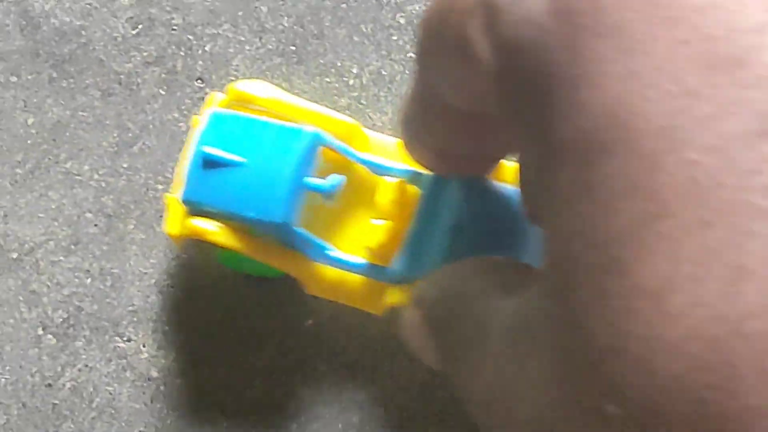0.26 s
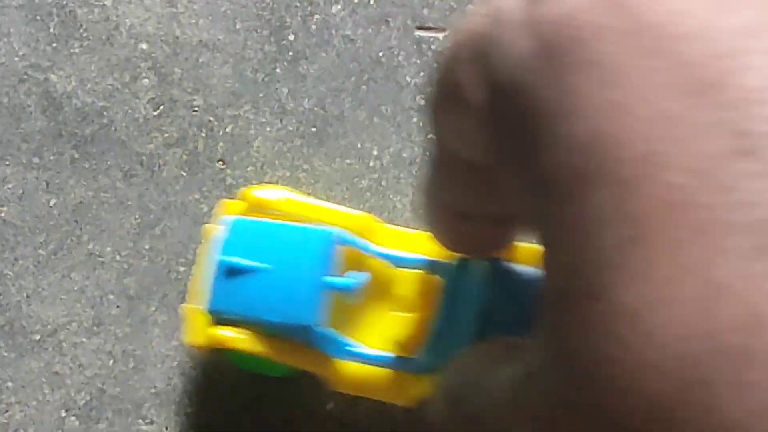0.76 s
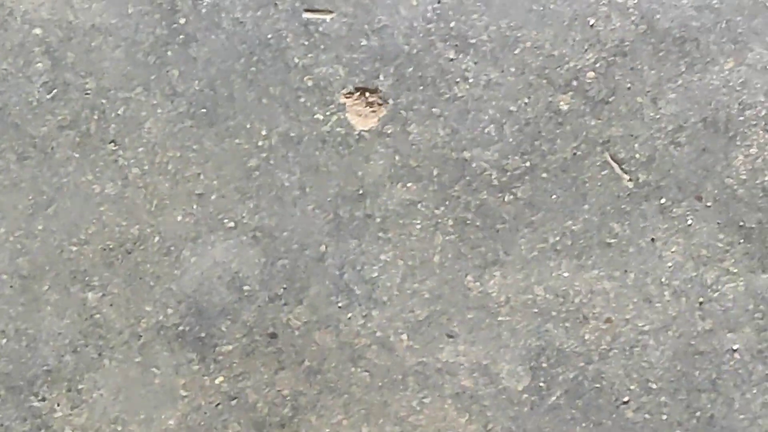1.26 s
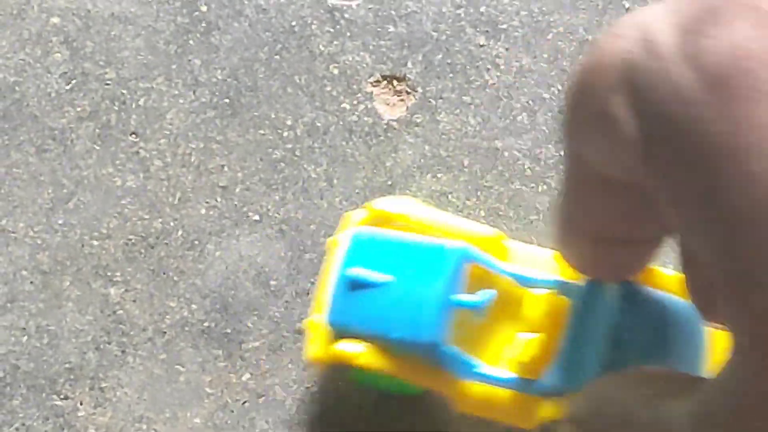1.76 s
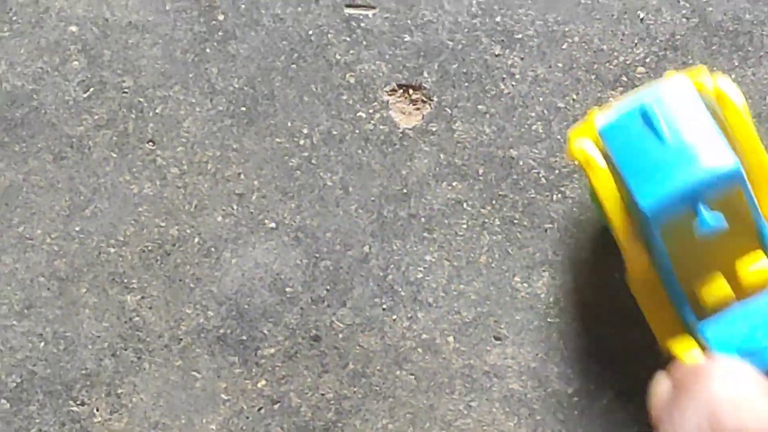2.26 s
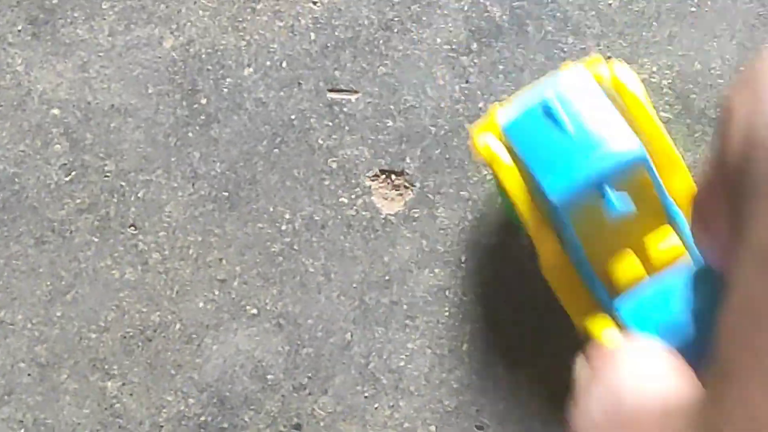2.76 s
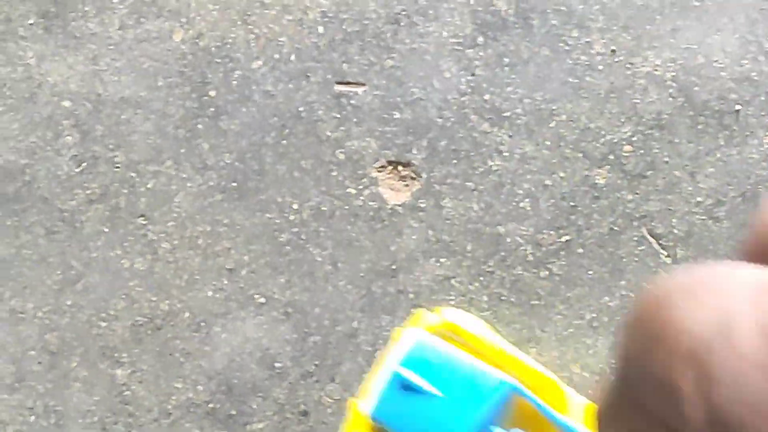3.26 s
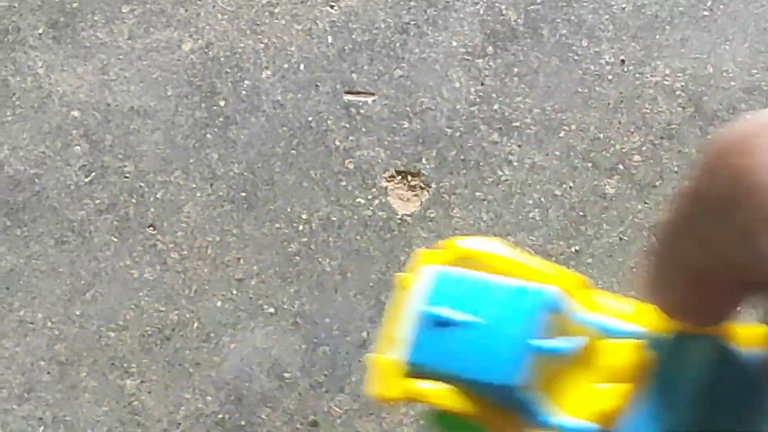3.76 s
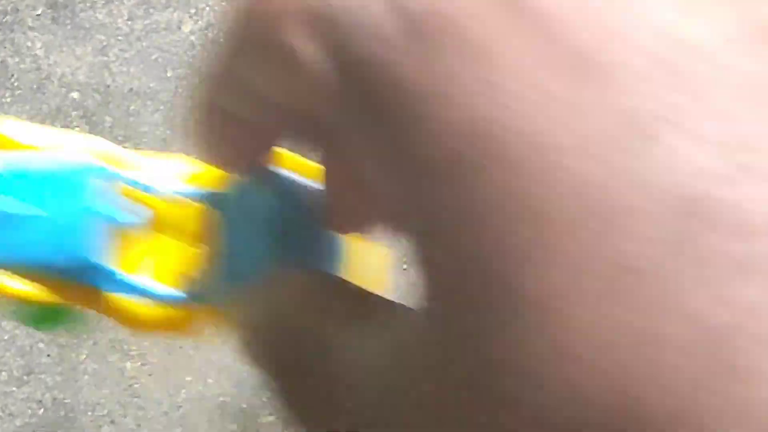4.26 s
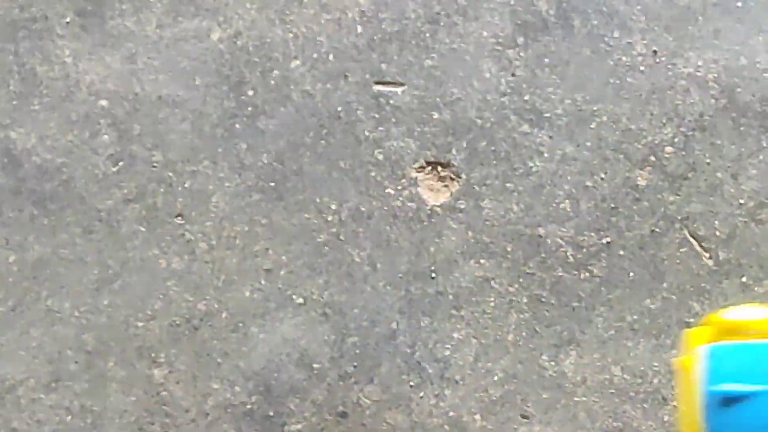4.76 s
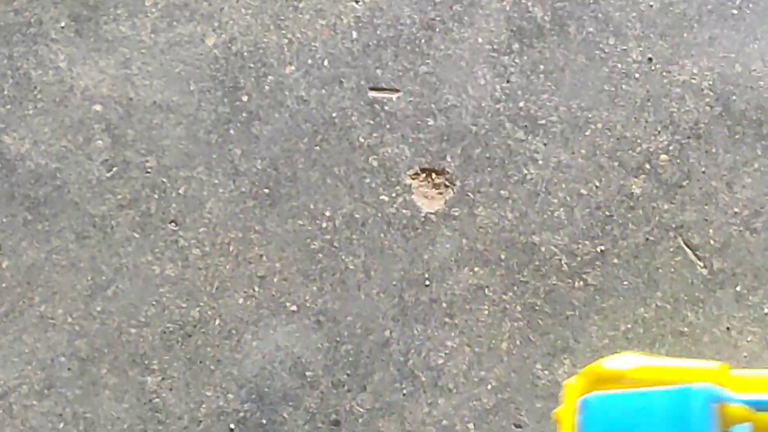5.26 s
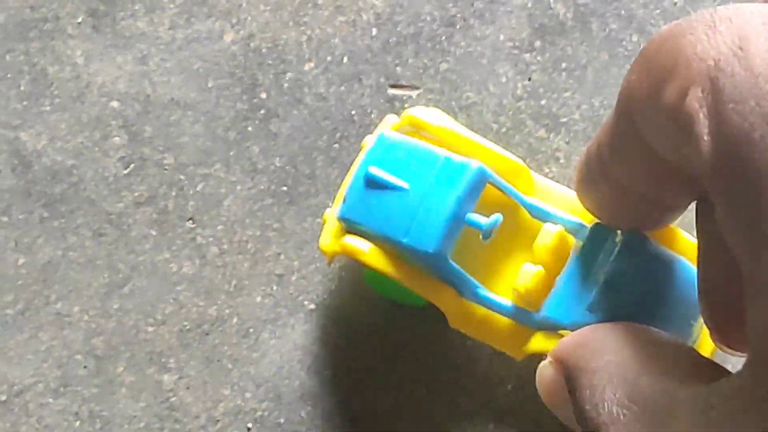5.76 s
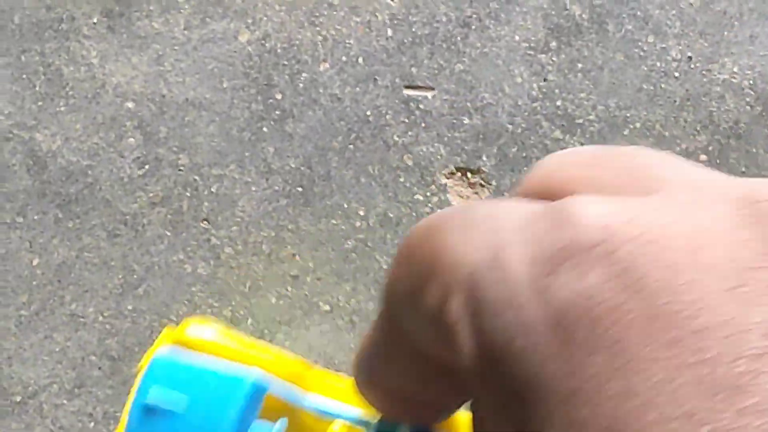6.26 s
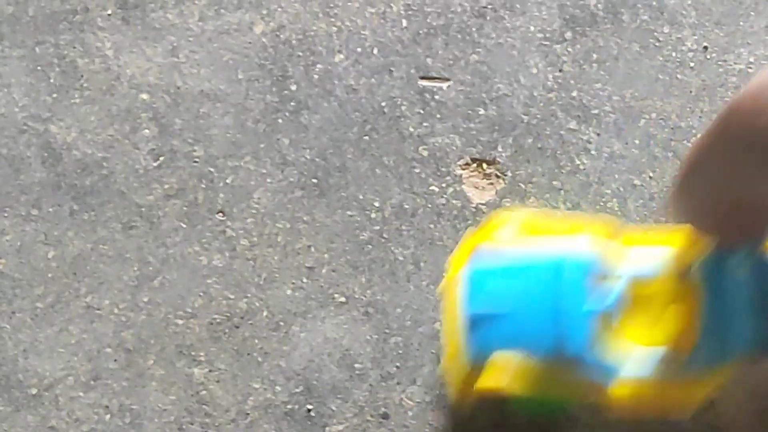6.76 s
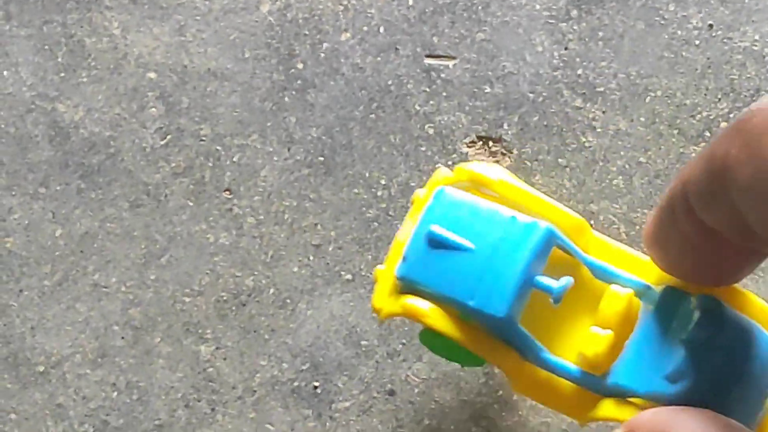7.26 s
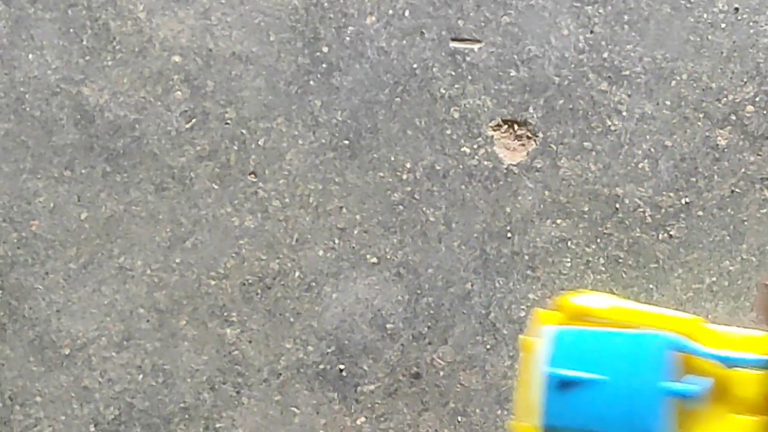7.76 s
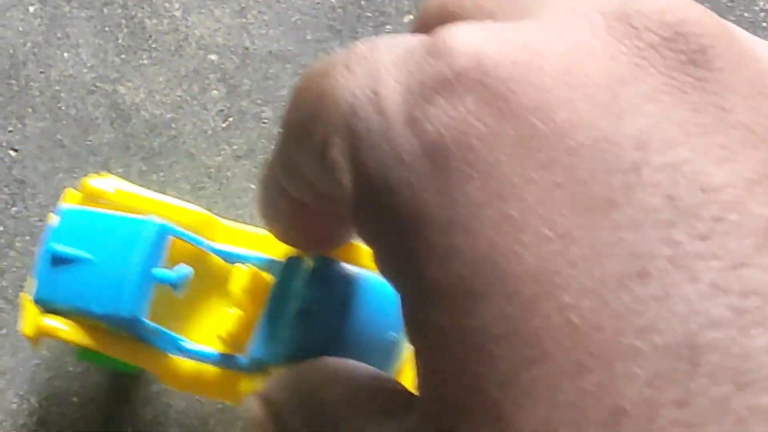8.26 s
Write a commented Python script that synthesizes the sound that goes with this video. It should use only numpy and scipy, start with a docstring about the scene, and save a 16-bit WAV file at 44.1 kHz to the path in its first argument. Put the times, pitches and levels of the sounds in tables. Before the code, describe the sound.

A hand pushes a small plastic toy car back and forth on rough concrete. Bright, brittle wheel rattle comes in uneven surges with brief lifts between. Soft dull hand bumps and a rumbling gust come midway; sharp plastic knocks then grow to a dense clatter before easing to sparse scrapes. Quiet open air, distant traffic, faint bird; close microphone, toy to the right, little echo.

```python
"""From the start a small hollow plastic toy car, pushed by hand over rough concrete, rattles in surges, louder right.
Grit taps, thousands a second, ring damped shell, wheel and edge modes; knocks ring the same modes harder.
Far traffic and wind, filtered noise, run throughout; a gust near 3.4 s lifts the lows and a narrow-noise hum.
From 3.7 s a far bird chirps faintly in gliding sines; dull noise-burst bumps come between 2.3 and 5.3 s.
From 4 s knocks and bright noise snaps grow harder, densest near 6.5 s; the rolling then thins out."""
import sys
import numpy as np
from scipy import signal
from scipy.fft import rfft, irfft, next_fast_len
from scipy.io import wavfile
from scipy.ndimage import map_coordinates

SR = 44100
rng = np.random.default_rng(int(sys.argv[2]) if len(sys.argv) > 2 else 0)


def file_out(sig):
    """Save sig as 16-bit WAV at sys.argv[1]."""
    # one column per channel
    cols = np.atleast_2d(sig).T
    # limit, then scale
    lim = np.clip(cols, -1, 1)
    pcm = np.round(lim * 32767).astype(np.int16)
    wavfile.write(sys.argv[1], SR, pcm)


def magnitude_from_level(level_db):
    """Linear magnitude for a level in decibels (20 dB per decade)."""
    exponent = np.asarray(level_db, float) / 20
    return 10 ** exponent


N = 375820

# wind buffeting spectrum: hz, relative_db_per_hz
BUFFET_SPECTRUM = [(7.1, -33), (12, 9), (29, -3.5), (41, -3.5), (52, -21), (70, -12.5), (91, -41),
                   (150, -120)]
# far traffic spectrum: hz, relative_db_per_hz
TRAFFIC_SPECTRUM = [(29, -38.5), (50, -1), (96, 3), (167, -7.5), (280, -18), (360, -44), (620, -120)]
# low-mid wash spectrum, also that of the rolling grumble: hz, relative_db_per_hz
WASH_SPECTRUM = [(130, -19), (220, -4), (414, -2), (480, -4.5), (1200, -19), (1560, -41), (2640, -120)]
# open-air hiss spectrum: hz, relative_db_per_hz
AIR_SPECTRUM = [(470, -18), (800, -1.5), (893, -3), (2570, -7.5), (2900, -6.5), (3240, -8.5), (3710, -7.5),
                (9300, -17), (13800, -17), (15000, -57)]
# left-right likeness of noise: hz, likeness_0_to_1
LIKENESS = [(30, 0.6), (125, 0.66), (250, 0.52), (500, 0.23), (1500, 0.018)]
# wind with one strong gust: time_s, over_calm_db
GUST = [(0.0, 0), (1.5, 0.5), (2.3, 2.5), (3.2, -1.5), (3.38, 15), (3.5, 15), (3.61, 6), (3.82, 9),
        (4.1, 4.5), (4.5, 1.5), (5.0, 3), (6.2, 1), (6.7, 2), (8.5, 0)]
# wash of far traffic and wind: time_s, level_db
WASH_LEVEL = [(0.0, -72), (1.1, -69.5), (1.6, -75.5), (2.4, -71.5), (3.25, -72), (3.45, -59), (3.62, -67),
              (4.0, -73.5), (5.1, -70.5), (6.0, -74.5), (7.3, -73.5), (8.5, -74)]
# bird notes before flutter and echo: start_s, length_s, start_hz, end_hz, level_db
BIRD_NOTES = [(3.706, 0.096, 3840, 3750, -85), (4.44, 0.09, 4480, 4530, -84), (4.48, 0.11, 3870, 3740, -82),
              (5.11, 0.078, 2860, 2800, -78), (7.399, 0.081, 3620, 3780, -83),
              (8.165, 0.075, 3420, 3670, -78), (8.202, 0.076, 3700, 3570, -80),
              (8.247, 0.092, 3400, 3120, -81), (8.28, .05, 3550, 3680, -87), (8.294, .1, 2980, 2750, -84)]
# echo decay: hz, t60_s
YARD_DECAY = [(800, 0.15), (5000, 0.27), (14000, 0.038)]
# soft contacts of the hand: start_s, centre_hz, width_hz, level_db, rise_s, t60_s
BUMPS = [(2.332, 334, 280, -51, 0.0044, 0.059), (3.385, 129, 110, -51, 0.0067, 0.18),
         (4.13, 298, 130, -52, 0.058, 0.47), (5.261, 430, 60, -61, 0.027, 0.32)]
# grit crushed under a blow, before the high-pass: start_s, level_db
SNAPS = [(3.1712, -44), (3.9924, -61), (4.0055, -57), (4.116, -56), (4.2103, -24), (4.756, -24.5),
         (4.761, -28), (5.325, -49), (6.002, -39), (6.4552, -42), (6.5146, -39), (6.5304, -29),
         (6.625, -28), (6.8107, -17), (7.7014, -59), (7.705, -35)]
# toy position: time_s, left_over_right_db
PAN = [(0.0, -10), (.6, -11), (3.6, -10), (3.9, -11.5), (4.5, -10.5), (4.75, -13), (5.58, -11),
       (6.38, -13.5), (7.3, -8), (8.2, -14)]
# share of the left-right step that a mode feels: hz, share
SHADOW = [(900, 0.022), (1500, 0.045), (2500, 0.66), (5500, 0.69), (9000, 0.55), (13000, 1)]
# hollow shell modes, width before damping: hz, base_width_hz, relative_db
SHELL_MODES = [(766, 780, -15), (1110, 980, -8), (1540, 630, -4), (2000, 1020, -0.5), (2500, 860, 1)]
# wheel modes, width before damping: hz, base_width_hz, relative_db
WHEEL_MODES = [(3400, 1100, -3.5), (4390, 1460, -2), (4915, 600, -4), (5410, 480, -4), (5930, 670, -4.5),
               (6500, 520, -5), (7020, 460, -6.5), (7580, 780, -6.5)]
# thin edge modes, width before damping: hz, base_width_hz, relative_db
EDGE_MODES = [(8400, 2800, 4), (9110, 2500, 1.5), (10320, 1500, -3.5), (11540, 1000, -6.5),
              (12620, 1500, -5.5), (13800, 1600, -6.5)]
# shoves and skids; rise and fall span 20 dB: peak_s, wheel_level_db, rise_s, fall_s, shell_over_wheels_db
SURGES = [(.15, -68, 0.26, 0.065, -2), (0.179, -55.5, 0.011, 0.095, -7), (.358, -60, 0.11, 0.12, -6.5),
          (.455, -57, 0.074, 0.13, -11), (.515, -53.5, 0.1, 0.025, -10.5), (.675, -63.5, 0.013, 0.24, -5),
          (.81, -52.5, 0.14, 0.17, -6.5), (.988, -49, 0.076, 0.057, -7.5), (1.125, -54.5, 0.16, 0.09, -6),
          (1.21, -57.5, 0.13, 0.085, -6.5), (1.34, -61.5, .015, 0.034, -16),
          (1.368, -58.5, 0.026, 0.28, -14), (1.439, -45.5, 0.02, 0.15, -16), (1.515, -55, 0.1, 0.17, -5.5),
          (1.605, -55.5, 0.036, 0.039, -7.5), (1.781, -69.5, 0.038, 0.06, -5),
          (1.817, -52.5, 0.0064, 0.14, -12.5), (1.901, -49, 0.078, 0.28, -9),
          (2.145, -59.5, 0.044, 0.032, -7), (2.19, -53.5, 0.011, 0.073, -11),
          (2.258, -55, 0.052, 0.12, -10), (2.478, -55.5, 0.13, 0.21, -7), (2.75, -64, 0.019, 0.18, -18),
          (2.834, -50.5, 0.14, 0.05, -7.5), (2.9, -51.5, 0.037, 0.1, -9.5),
          (2.97, -50.5, 0.02, 0.22, -10.5), (3.18, -65, .015, 0.13, -16), (3.22, -54, 0.046, 0.29, -13),
          (3.3, -49.5, 0.2, 0.17, -6), (3.39, -55.5, 0.2, 0.061, -8), (3.526, -61.5, 0.18, 0.068, -7),
          (3.64, -64, 0.05, 0.12, -8.5), (4.011, -49, 0.016, 0.094, -10), (4.12, -53.5, 0.0092, 0.16, -6.5),
          (4.17, -50.5, 0.086, 0.13, -9.5), (4.219, -40.5, 0.027, 0.081, -8.5),
          (4.258, -45, 0.099, 0.089, -12.5), (4.765, -48, 0.025, 0.12, -16),
          (4.855, -46, 0.049, 0.18, -10.5), (4.94, -52.5, 0.13, 0.08, -5.5), (5.333, -63, 0.017, 0.18, -6),
          (5.41, -54.5, 0.029, 0.11, -0.5), (5.471, -44.5, 0.11, 0.07, -16),
          (5.668, -41.5, 0.088, 0.083, -9.5), (5.875, -59, 0.074, 0.15, -4.5), (5.98, -66, 0.31, .03, -12),
          (6.023, -48.5, 0.013, 0.39, -9.5), (6.12, -49.5, 0.14, 0.37, -3.5), (6.35, -53, 0.58, 0.17, -14),
          (6.451, -44.5, 0.013, 0.16, -2), (6.535, -35.5, 0.12, 0.045, -11.5),
          (6.62, -42.5, 0.072, 0.081, -9.5), (6.733, -39.5, 0.04, 0.14, -13.5),
          (6.77, -43, 0.07, 0.038, -8.5), (6.821, -35, 0.035, 0.074, -12), (6.914, -41.5, 0.061, 0.06, -14),
          (6.97, -45.5, 0.011, 0.091, -8), (6.998, -48.5, 0.074, 0.086, -26),
          (7.124, -47, 0.068, 0.037, -15), (7.145, -62, .02, 0.13, -13), (7.71, -50.5, .011, 0.036, -26),
          (7.796, -57.5, 0.091, 0.021, -9), (7.96, -54, 0.27, 0.095, -9), (8.29, -76.5, 0.049, 0.16, -5),
          (8.433, -66, 0.073, 0.11, 0)]
# wheels touch down; a surge is silent before the last touch ahead of its peak: time_s
SET_DOWN_S = [0.0, .66, 1.335, 1.81, 2.736, 3.165, 3.993, 4.748, 5.315, 6.447, 7.098, 7.7, 8.4]
# edges against wheels in rolling, before lag and trim: time_s, relative_db
EDGE_LEVEL = [(0.0, -4.5), (.6, -3.5), (1.7, -6), (2.2, -4), (3.3, -5.5), (4.1, -5), (4.8, -7), (5.3, -7),
              (5.8, -5.5), (6.2, -4.5), (6.7, -5), (7.2, -8.5), (8.0, -6)]
# modes that face the microphones as the toy tilts: time_s, favoured_wheel_hz, favoured_shell_hz
TILT = [(.2, 5500, 1770), (.45, 5100, 2180), (.8, 5100, 1602), (.98, 5900, 1840), (1.13, 5260, 1670),
        (1.5, 5430, 1800), (1.9, 5330, 2020), (2.2, 5430, 2200), (2.5, 5950, 1770), (2.9, 6200, 1850),
        (3.3, 5290, 1790), (4.03, 5490, 2200), (4.25, 6050, 1900), (4.86, 5500, 1670), (5.45, 5600, 1840),
        (5.67, 6100, 1860), (5.9, 5900, 1920), (6.12, 5900, 2540), (6.3, 6030, 1800), (6.47, 5560, 2240),
        (6.53, 6060, 2170), (6.62, 6000, 1965), (6.73, 5750, 2280), (6.76, 7100, 2160), (6.83, 6220, 2340),
        (6.92, 7200, 2305), (6.99, 5930, 2000), (7.12, 6900, 2200), (7.85, 5380, 1840)]
# knocks, before trim and per-part offsets: start_s, level_db, pitch_hz
KNOCKS = [(.1785, -43.5, 5740), (.2135, -44.5, 5500), (.3477, -46, 5500), (.396, -43, 4480),
          (.446, -50, 5500), (.5153, -39, 5940), (.738, -49, 5000), (.7578, -51, 5000), (.807, -45, 6000),
          (.821, -39, 6900), (.9028, -40, 6120), (.9642, -36, 6600), (.978, -42, 6300), (.986, -45, 6000),
          (.992, -41, 6500), (1.108, -45, 5400), (1.118, -43, 5400), (1.141, -39, 5300),
          (1.1772, -38, 5700), (1.309, -50, 4880), (1.3398, -49, 6350), (1.3665, -42, 5400),
          (1.4302, -39, 5250), (1.816, -50, 6000), (1.8285, -45, 6760), (1.864, -35, 6790),
          (1.8893, -31, 4650), (2.0862, -38.5, 5260), (2.1356, -42, 5300), (2.1897, -40.5, 5160),
          (2.245, -43, 6500), (2.253, -51, 5630), (2.4734, -41, 7000), (2.5062, -34.5, 7100),
          (2.7417, -46, 6530), (2.817, -35, 4710), (2.8938, -35.5, 7140), (2.9682, -47, 6420),
          (3.0898, -37.5, 5800), (3.172, -43.5, 5300), (3.1977, -44, 5300), (3.2181, -43, 5000),
          (3.392, -48, 5000), (3.523, -53, 5500), (3.9868, -54, 6170), (3.9935, -38, 6160),
          (4.0052, -25, 5830), (4.0097, -45, 7000), (4.0145, -38, 4800), (4.0178, -32, 4800),
          (4.19, -31, 5720), (4.2103, -22.5, 5170), (4.7488, -40, 6630), (4.7549, -22, 5900),
          (4.7558, -17, 6800), (4.7606, -28, 5000), (5.3153, -34, 6900), (5.3265, -24.5, 6000),
          (5.3356, -41, 5600), (5.4035, -51, 5590), (5.648, -38, 6000), (5.668, -33, 6300),
          (5.839, -39, 5900), (5.8702, -41, 5350), (5.9161, -47.5, 5140), (5.96, -47, 5250),
          (6.0008, -40, 5770), (6.0135, -47, 5000), (6.0258, -49, 6200), (6.1238, -35, 7100),
          (6.2314, -44, 6180), (6.3775, -40, 5570), (6.4557, -23, 5370), (6.449, -35, 5460),
          (6.469, -27, 5600), (6.4965, -30, 6260), (6.5136, -18.5, 5530), (6.5165, -23, 6000),
          (6.521, -23, 6500), (6.5311, -15, 6300), (6.5394, -26.5, 6440), (6.5528, -28, 5530),
          (6.6242, -26, 5800), (6.7132, -40, 5450), (6.7277, -23, 5400), (6.7317, -21, 5440),
          (6.746, -22, 7000), (6.76, -27, 7000), (6.773, -25, 6700), (6.8105, -30, 7140),
          (6.8255, -34, 6000), (6.8958, -28, 6800), (6.922, -24, 7200), (6.9686, -37, 5460),
          (7.031, -50, 7400), (7.1014, -33, 7460), (7.6903, -42, 6900), (7.7043, -27, 5840),
          (7.7072, -37, 6500), (7.841, -48, 5500), (7.865, -45, 6500), (7.885, -34.5, 5800),
          (7.9348, -36, 4700), (7.9655, -33, 5260), (8.4048, -51.5, 5000), (8.4277, -44, 5260)]
# steep low-pass above 14 kHz: hz, gain_db
LOW_PASS = [(13900, -1), (14250, -9), (14400, -28), (16000, -38)]
# colour of the left port: hz, gain_db
LEFT_PORT = [(1600, 0.5), (2200, 1), (3000, 2), (4500, 1), (6500, -1), (7600, -0.5), (8700, 3.5),
             (9400, -0.5), (10400, -5), (11600, 0.5), (13500, 0.5)]
# colour of the right port: hz, gain_db
RIGHT_PORT = [(2600, 0), (3100, -3), (3500, 0), (7500, 2), (8300, -6.5), (9400, 0.5), (11000, 1.5),
              (13200, 0.5)]

BUFFET_DB, TRAFFIC_DB, AIR_DB = -59, -66.5, -71.5
HUM_PEAK_S, HUM_DB, HUM_RISE_S, HUM_FALL_S = 3.4, -57, 0.12, 1.31  # rise and fall span 20 dB
SWELL_POWER = 1.253  # 1 = pointed, 2 = rounded
SNAP_T60_S, SNAP_LOW_HZ = 0.0055, 7540
TICKS_PER_S, TICK_LEAST_DB, TICK_BASE_HZ = 70, -5, 5900  # level over the rattle
KNOCK_SHELL_DB, KNOCK_EDGE_DB = -12, -9  # against the wheels, before lag
SHELL_LAG, KNOCK_EDGE_LAG = 0.6, 0.09  # dB lost per dB of a harder knock
EDGE_LAG, GRUMBLE_LAG = 0.012, 0.35  # dB lost per dB of harder rolling
GRUMBLE_DB = -17  # against the shell, before lag
FOCUS_DB_PER_OCT, FOCUS_MOST_DB = 11.5, 11.5  # rolling modes away from the favoured pitch
KNOCK_DAMP, ROLL_DAMP = 1.35, 0.85  # mode width factors: pressed blow, free rolling


def unit(x):
    """Scales to rms 1."""
    return x / np.sqrt(np.mean(x ** 2) + 1e-20)


def along(points, hz):
    """Reads (hz, value) points on a log frequency axis."""
    f, v = np.transpose(points)
    return np.interp(np.log(hz + 1), np.log(f + 1), v)


def curves(rows):
    """One value per sample for each column after the time."""
    s, *cols = np.transpose(rows)
    return [np.interp(np.arange(N) / SR, s, c) for c in cols]


def wobble(knots_per_s):
    """Smooth random curve."""
    knots = rng.standard_normal(int(N * knots_per_s / SR) + 4)
    return map_coordinates(knots, [np.arange(N) * knots_per_s / SR])


def swell(t_s, peak_s, level_db, rise_s, fall_s):
    """Level in dB that climbs to a peak and sinks again."""
    before = (peak_s - t_s) / np.abs(rise_s)
    after = (t_s - peak_s) / np.abs(fall_s)
    return level_db - 20 * np.where(t_s < peak_s, before, after) ** SWELL_POWER


def ring(x, hz, width_hz):
    """Damped resonance driven by x."""
    r = np.exp(-np.pi * width_hz / SR)
    return signal.lfilter([1, 0, -1], [1, -2 * r * np.cos(2 * np.pi * hz / SR), r * r], x)


def mode(x, hz, width_hz):
    """Plastic mode: swells for a moment, dies fast; a unit blow peaks near 1."""
    return ring(ring(x, hz, width_hz), hz, width_hz) * np.e * np.pi * width_hz / (2 * SR)


def rush(spectrum):
    """Stereo noise of rms 1, shaped by a spectrum, alike in both ports by LIKENESS."""
    size = next_fast_len(N)
    hz = np.fft.rfftfreq(size, 1 / SR)
    turn = np.arccos(np.clip(along(LIKENESS, hz), -1, 1)) / 2
    z = rfft(rng.standard_normal((2, size))) * magnitude_from_level(along(spectrum, hz))
    mid, side = irfft(z * [np.cos(turn), np.sin(turn)], size)[:, :N]
    return unit(np.array([mid + side, mid - side]))


def outdoors():
    """Wind lumps on the ports, far traffic and open-air hiss; all the lows swell in the gust."""
    gust_db, = curves(GUST)
    wash_db, = curves(WASH_LEVEL)
    buffet = magnitude_from_level(BUFFET_DB + gust_db + 1.95 * wobble(3.98)) * rush(BUFFET_SPECTRUM)
    traffic = magnitude_from_level(TRAFFIC_DB + gust_db + 1.5 * wobble(4.005)) * rush(TRAFFIC_SPECTRUM)
    wash = magnitude_from_level(wash_db + 1.14 * wobble(4.5)) * rush(WASH_SPECTRUM)
    air = magnitude_from_level(AIR_DB + 0.38 * wobble(4)) * magnitude_from_level([[-1.2], [1.2]]) * rush(AIR_SPECTRUM)
    return buffet + traffic + wash + air


def hum():
    """Narrow low noise band that swells in the gust and lingers."""
    level_db = swell(np.arange(N) / SR, HUM_PEAK_S, HUM_DB, HUM_RISE_S, HUM_FALL_S)
    note = ring(ring(rng.standard_normal(N), hz=140.5, width_hz=36), hz=140.5, width_hz=36)
    return magnitude_from_level(level_db) * unit(note)


def bird():
    """Thin gliding whistles, blurred by distance and moving air."""
    x = np.zeros(N + SR)
    waver_hz = 95 * wobble(150)
    for start_s, length_s, start_hz, end_hz, level_db in BIRD_NOTES:
        start = round(start_s * SR)
        u = np.arange(round(length_s * SR)) / (length_s * SR)
        pitch_hz = start_hz + (end_hz - start_hz) * u + waver_hz[start:][:len(u)]
        whistle = np.sin(2 * np.pi * np.cumsum(pitch_hz) / SR)
        x[start:][:len(u)] += magnitude_from_level(level_db) * np.sin(np.pi * u) * whistle
    return x[:N] * magnitude_from_level(3.4 * wobble(100))


def yard(x):
    """Ground, hand and nearby walls answer briefly as decaying noise; the top dies first."""
    hz, t_s, z = signal.stft(rng.standard_normal((2, SR // 4)), SR, nperseg=256)
    decay = magnitude_from_level(-60 * t_s / along(YARD_DECAY, hz)[:, None])
    tail = signal.istft(z * decay, SR, nperseg=256)[1]
    return signal.fftconvolve(x, tail / np.linalg.norm(tail[0]), axes=1)[:, :N]


def bumps():
    """Soft hand contacts: enveloped noise bands with hardly any ring."""
    x, t_s = np.zeros(N), np.arange(SR // 3) / SR
    for start_s, hz, width_hz, level_db, rise_s, t60_s in BUMPS:
        puff = unit(ring(ring(rng.standard_normal(len(t_s)), hz, width_hz), hz, width_hz))
        envelope = magnitude_from_level(level_db - 60 * t_s / t60_s) * (1 - np.exp(-t_s / rise_s))
        x[round(start_s * SR):][:len(t_s)] += envelope * puff
    return x


def snaps():
    """Grit crushed under a blow: very short bright noise cracks, louder at the right port."""
    x, t_s = np.zeros((2, N)), np.arange(SR // 50) / SR
    pan_db, = curves(PAN)
    for start_s, level_db in SNAPS:
        start = round(start_s * SR)
        crack = magnitude_from_level(level_db - 60 * t_s / SNAP_T60_S) * rng.standard_normal((2, len(t_s)))
        x[:, start:][:, :len(t_s)] += crack * magnitude_from_level([[.5], [-.5]] * pan_db[[start]])
    return signal.sosfilt(signal.butter(2, SNAP_LOW_HZ, "high", fs=SR, output="sos"), x)


def rolling():
    """Overlapping surges add their power: wheel and shell levels in dB."""
    t_s = np.arange(0, N, 32) / SR
    peak_s, level_db, rise_s, fall_s, shell_db = np.transpose(SURGES)[:, :, None]
    touch_s = np.array(SET_DOWN_S)[np.searchsorted(SET_DOWN_S, peak_s) - 1]
    power = magnitude_from_level(2 * swell(t_s, peak_s, level_db, rise_s, fall_s)) * (t_s >= touch_s)
    sums = [power.sum(axis=0), (power * magnitude_from_level(2 * shell_db)).sum(axis=0)]
    return [np.interp(np.arange(N) / SR, t_s, 10 * np.log10(p + 1e-13)) for p in sums]


def grit(per_s, spread_db, clump_db):
    """Random taps of sand under the wheels: many small, a few larger, in clumps."""
    hit = rng.random(N) < per_s / SR
    size_db = spread_db * np.minimum(rng.exponential(1, N), 4.5)
    return hit * magnitude_from_level(size_db + clump_db * wobble(40) + clump_db * wobble(200))


def ticks(rattle_db):
    """Stray grains that snap while rolling: rows of start_s, level_db, pitch_hz."""
    luck = rng.random((900, 4))
    luck = luck[luck[:, 3] < TICKS_PER_S * N / SR / len(luck)]
    start_s = luck[:, 0] * (N - 1) / SR
    level_db = rattle_db[(start_s * SR).astype(int)] + TICK_LEAST_DB + 8 * luck[:, 1]
    pitch_hz = TICK_BASE_HZ * 2 ** (0.64 * luck[:, 2] - .35)
    return np.transpose([start_s, level_db, pitch_hz])


def jolt(start_s, level_db, spread_s):
    """A knock is four contacts of the loose wheels within moments, each weaker."""
    lag_s = np.cumsum(rng.exponential(1, (len(start_s), 4)), axis=1) * spread_s * [0, 1, 1, 1]
    at = np.clip(((start_s[:, None] + lag_s) * SR).astype(int), 0, N - 1)
    return at, level_db[:, None] - [0, 9, 12, 16]


def part(modes, taps, roll_db, pan_db, at, knock_db, knock_hz, alike, face_hz=None):
    """Each tap lands elsewhere, so it rings every mode at a new strength, partly new at each port."""
    rolled, knocked = np.zeros((2, 2, N))
    side = np.array([[.5], [-.5]])
    for hz, width_hz, level_db in modes:
        shared = alike * rng.standard_normal(N)
        luck = shared + np.sqrt(1 - alike ** 2) * rng.standard_normal((2, N))
        favour = magnitude_from_level(2.45 * wobble(120) + 1.76 * wobble(14))  # as the wheels turn, each mode comes and goes
        if face_hz is not None:
            away_db = FOCUS_DB_PER_OCT * np.abs(np.log2(hz / face_hz))
            favour *= magnitude_from_level(-np.minimum(away_db, FOCUS_MOST_DB))
        gain = magnitude_from_level(level_db) * magnitude_from_level(along(SHADOW, hz) * side * pan_db)
        rolled += gain * unit(mode(taps * luck * favour, hz, ROLL_DAMP * width_hz))
        # modes near the struck spot's pitch ring most
        near_db = -np.minimum(22 * np.abs(np.log2(hz / knock_hz)), 9)
        size = magnitude_from_level(knock_db + near_db[:, None] + rng.normal(0, 1.0, at.shape))
        blows = np.zeros((2, N))
        blows[:, at] = size * magnitude_from_level(rng.normal(0, 1.8, (2,) + at.shape))
        knocked += gain * mode(blows, hz, KNOCK_DAMP * width_hz)
    return magnitude_from_level(roll_db) * rolled / np.linalg.norm(magnitude_from_level(np.array(modes)[:, 2])) + knocked


def grumble(shell_db):
    """Dull low noise of rolling; follows the shell, less so when hard."""
    lag_db = GRUMBLE_LAG * np.maximum(shell_db + 56, 0)
    return magnitude_from_level(shell_db + GRUMBLE_DB - lag_db) * rush(WASH_SPECTRUM)


def car():
    """Shell, wheels and edges ring from the same grit and the same knocks."""
    rattle_db, shell_db = rolling()
    edge_db = rattle_db + curves(EDGE_LEVEL)[0] - EDGE_LAG * (rattle_db + 44.0)
    pan_db, = curves(PAN)
    wheel_hz, shell_hz = curves(TILT)
    start_s, level_db, knock_hz = np.transpose(np.concatenate([KNOCKS, ticks(rattle_db)]))
    taps = grit(per_s=4000, spread_db=1.7, clump_db=.9)
    at, blow_db = jolt(start_s, level_db + 1.6, spread_s=0.0008)
    shell_blow_db = blow_db + KNOCK_SHELL_DB - SHELL_LAG * (level_db[:, None] + 40.0)
    edge_blow_db = blow_db + KNOCK_EDGE_DB - KNOCK_EDGE_LAG * (level_db[:, None] + 28.0)
    # rolling trims: shell +2 dB, edges +0.5 dB
    x = part(SHELL_MODES, taps, shell_db + 2.0, pan_db, at, shell_blow_db, knock_hz,
             alike=0.69, face_hz=shell_hz)
    x += part(WHEEL_MODES, taps, rattle_db, pan_db, at, blow_db, knock_hz,
              alike=0.32, face_hz=wheel_hz)
    x += part(EDGE_MODES, taps, edge_db + 0.5, pan_db, at, edge_blow_db, knock_hz, alike=0.26)
    x += grumble(shell_db)
    x[1] = np.pad(x[1], (6, 0))[:N]  # reaches the right port 6 samples later
    return x


def scene():
    """The open air, the bird, the toy and their echoes."""
    far = bird() * magnitude_from_level([[-1.5], [1.5]])
    toy = car() + snaps()
    near = toy + magnitude_from_level(-14) * yard(toy)
    return near + far + magnitude_from_level(6.0) * yard(far) + bumps() + hum() + outdoors()


def low_pass(x):
    """Removes everything above the highest recorded frequency."""
    return signal.sosfilt(signal.butter(12, 15610, fs=SR, output="sos"), x)


def record(dry):
    """Each microphone port has its colour; then a steep low-pass cuts above 14 kHz."""
    size = next_fast_len(N)
    hz = np.fft.rfftfreq(size, 1 / SR)
    port_db = np.array([along(LEFT_PORT, hz), along(RIGHT_PORT, hz)])
    low_pass_db = along(LOW_PASS, hz)
    mix = irfft(rfft(dry, size) * magnitude_from_level(port_db + low_pass_db), size)[:, :N]
    return low_pass(mix)


dry = scene()
out = record(dry)
file_out(out)
```